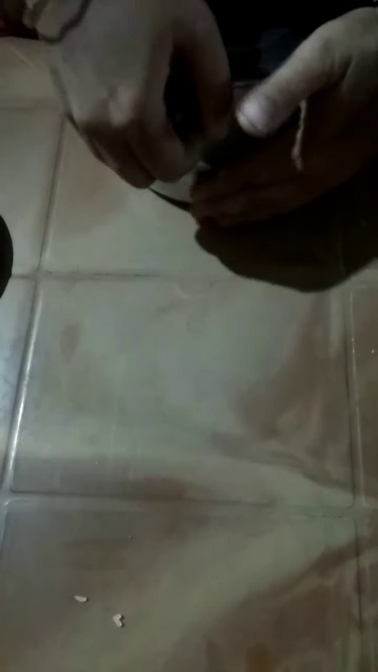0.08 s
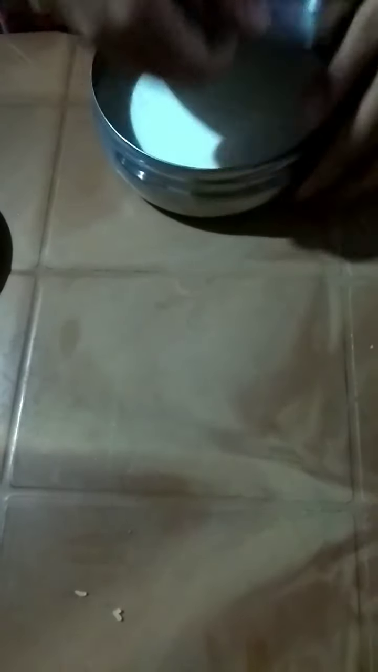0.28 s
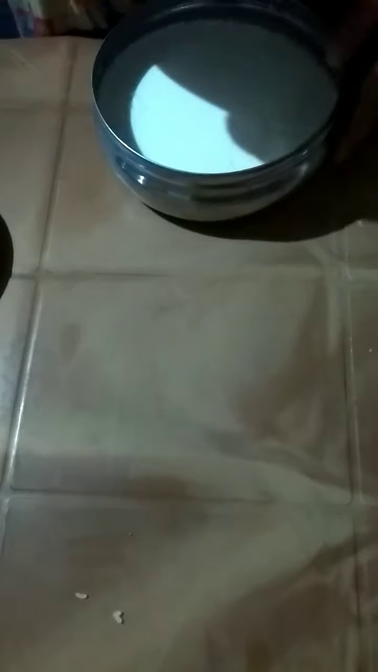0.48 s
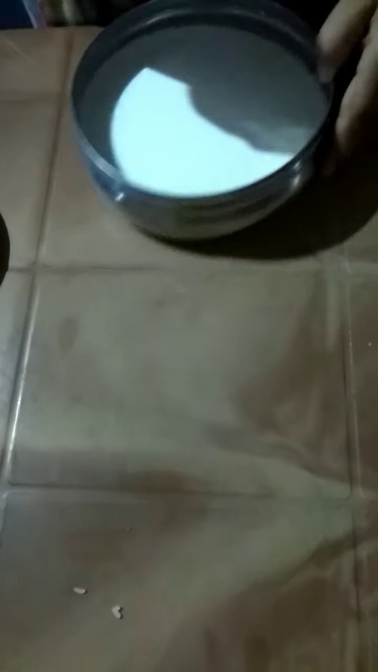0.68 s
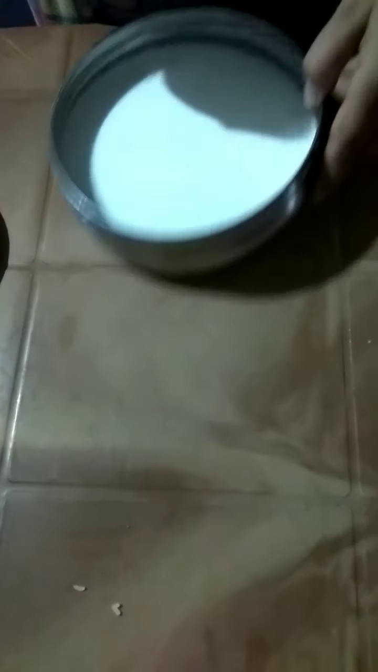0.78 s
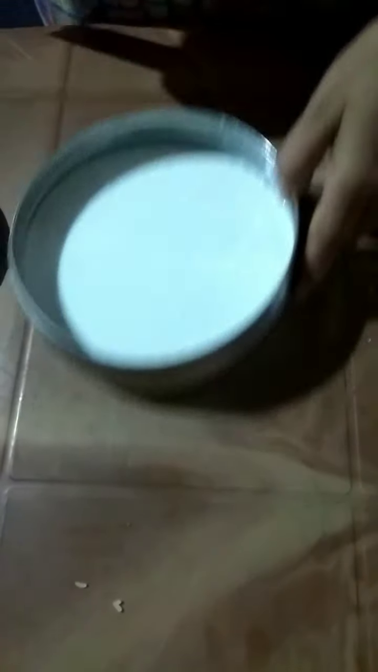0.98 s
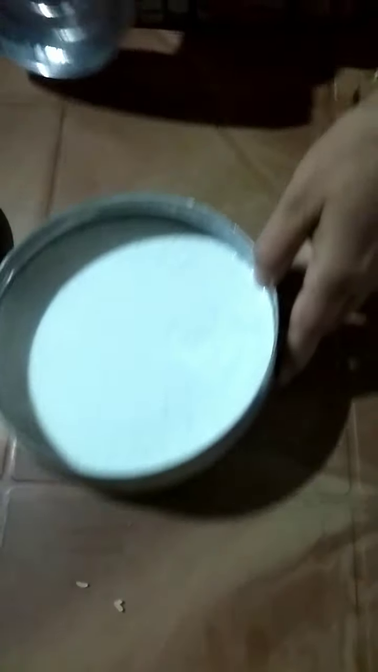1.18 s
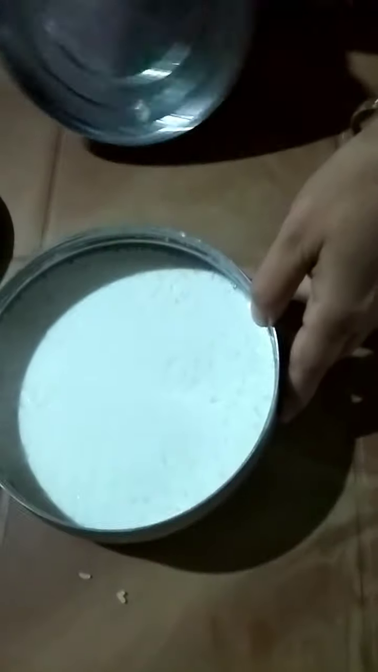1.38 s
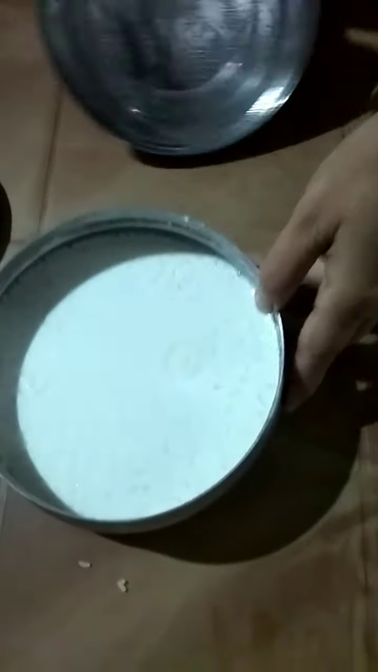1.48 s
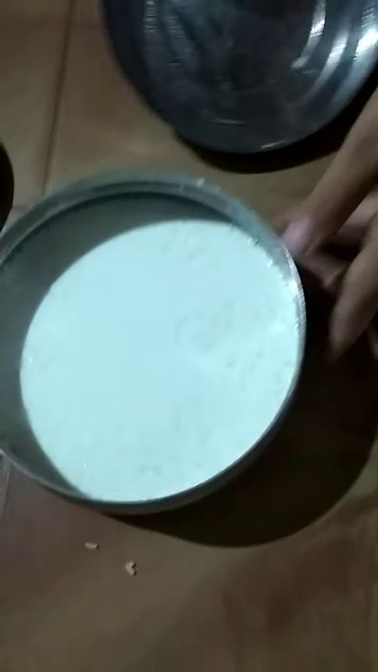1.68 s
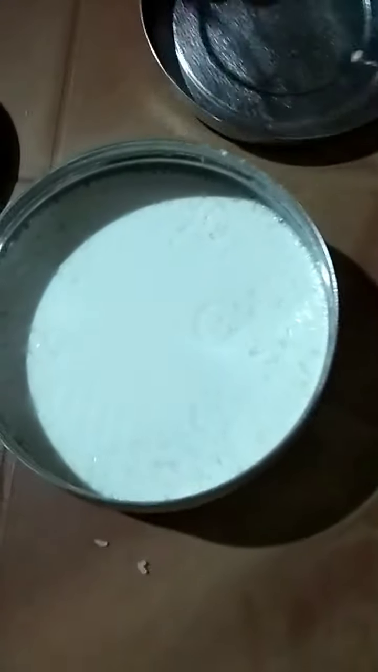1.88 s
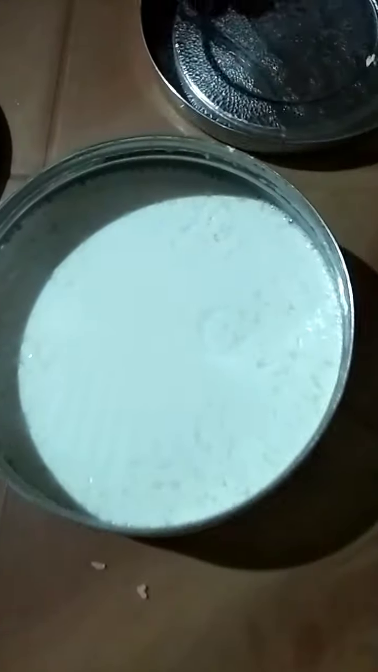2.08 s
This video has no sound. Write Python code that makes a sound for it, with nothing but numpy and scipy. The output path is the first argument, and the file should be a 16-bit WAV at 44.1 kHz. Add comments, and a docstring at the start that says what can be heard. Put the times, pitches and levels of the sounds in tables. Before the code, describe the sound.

A tight steel lid pops off a round tin with a sharp, briefly ringing metallic clank

```python
"""A soft low bump over steady hiss and room rumble; then a tight steel lid pops off a round tin and rings.
The lid ticks lightly as it is lifted away; hands carry the full tin with bumps, knocks and a dry rustle,
then set it down on kitchen tiles with a thud. Struck steel is damped sine modes; contacts are coloured noise
bursts; handling and background are coloured noise; the hard-walled room is noise dying at its own rate
per frequency."""
import sys
import numpy as np
from scipy import signal
from scipy.fft import rfft, irfft, next_fast_len
from scipy.io import wavfile
from scipy.ndimage import uniform_filter1d, map_coordinates

SR = 44100
rng = np.random.default_rng(int(sys.argv[2]) if len(sys.argv) > 2 else 0)


def transcribe(signal):
    """Save signal, clipped to [-1, 1], as a 16-bit WAV file at the path in sys.argv[1]."""
    frames = np.atleast_2d(signal).T
    limited = np.clip(frames, -1, 1)
    pcm = np.round(limited * 32767).astype(np.int16)
    wavfile.write(sys.argv[1], SR, pcm)


N = 92610
TOP_HZ = 15900

# All *_COLOUR tables are spectra, scaled to rms 1 before use: hz, relative_db

# Likeness of left and right noise: hz, correlation
LIKENESS = [(60, 0.94), (150, 1), (300, 1), (640, 0.43), (1400, 0), (3000, 0.026), (7000, 0)]
RASP_LIKENESS = [(200, 0.98), (1500, 0.41), (10000, 0.1)]
# Spacing of the random spectral peaks that stand for dense steel modes
STEEL_MODE_HZ, STEEL_CLUSTER_HZ = 35, 130
STEEL_RIPPLE_DB, RUSTLE_RIPPLE_DB, THUD_RIPPLE_DB = 6.5, 4, 2
CONTACT_ATTACK_S, RING_ATTACK_S = .0005, .001

# Background
HISS_DB, RUMBLE_DB = -54.5, -56.5
HISS_COLOUR = [(350, -65.5), (600, -25), (790, -6), (869, -35), (1750, -26), (2040, -22), (2210, -37),
               (3300, -47), (6370, 3), (8390, -13), (10300, 6), (11300, -11.5), (14500, -2), (15400, -21),
               (16000, -44.5)]
RUMBLE_COLOUR = [(10, -19), (25, 7), (50, -13), (100, -27), (143, -10), (180, -18.5), (300, -13.5),
                 (450, -52), (2000, -82)]

# Dry rustle, before the trim: time_s, level_db
RUSTLE_LEVEL = [(0, -53), (0.19, -57), (0.23, -40.5), (0.5, -63), (0.65, -53.5), (0.73, -48.5), (0.98, -51),
                (1.08, -47), (1.31, -50), (1.48, -60), (1.62, -55.5), (2.1, -57)]
RUSTLE_TRIM_DB, GRAIN_DB = 2, 1
RUSTLE_COLOUR = [(2650, -33), (4500, -6.5), (5280, -1.5), (5960, -10.5), (7690, -1), (8640, -6.5),
                 (9870, -3), (12300, 0), (15200, -8.5), (16000, -14)]
# Skin rubbing on steel: time_s, level_db
RUB_LEVEL = [(0, -58), (0.1, -60.5), (0.55, -62), (0.66, -59), (0.8, -50), (0.95, -54), (1.15, -53.5),
             (1.32, -57), (1.5, -62), (2.1, -70.5)]
RUB_COLOUR = [(150, -38), (250, -3.5), (450, -8.5), (750, -4), (1200, -7.5), (1700, -9.5), (2600, -7),
              (3300, -12.5), (4500, -17), (6000, -12), (8000, -48)]
# Finger sliding along the steel wall as the tin is put down: time_s, level_db
SLIDE_LEVEL = [(1.15, -95), (1.36, -54), (1.48, -55.5), (1.72, -59.5), (1.9, -64)]
SLIDE_COLOUR = [(5500, -57), (6700, -13.5), (7250, 1), (7700, -10), (8400, -51)]
# Low shudder of the carried tin: time_s, level_db
HEFT_LEVEL = [(0, -49.5), (0.15, -58.5), (0.55, -71), (0.63, -47), (0.8, -59), (0.93, -41.5), (1.15, -48.5),
              (1.32, -46.5), (1.5, -59), (2.1, -64.5)]
HEFT_COLOUR = [(21, -30), (35, 3), (135, 1.5), (178, 2), (215, -16), (296, -3.5), (391, -14), (433, -25),
               (500, -12), (650, -26), (1100, -120)]

# Bumps and scuffs of fingers and tin: start_s, level_db, centre_hz, t60_s, width_octaves
BUMPS = [(0.0, -29.5, 35, 0.11, 0.41), (0.0, -39.5, 150.3, 0.29, 0.046), (0.0, -43, 560, 0.15, 1),
         (0.187, -39.5, 305, 0.054, 0.45), (0.206, -41, 138, 0.44, 1), (0.422, -33.5, 2490, 0.088, 0.33),
         (0.606, -48, 290, 0.25, 1), (0.657, -33.5, 463, 0.1, 0.7), (0.678, -40, 136.6, 0.17, 0.031),
         (0.867, -46.5, 284, 0.14, 0.84), (0.897, -45, 410, 0.35, 0.59), (0.924, -40.5, 400, 0.19, 0.45),
         (1.081, -38.5, 1240, 0.048, 0.21), (1.087, -32, 67, 0.22, 0.82), (1.129, -35, 156, 0.052, 0.51),
         (1.134, -47.5, 1060, 0.095, 0.31), (1.347, -36, 134.4, 0.15, 0.1),
         (1.594, -30.5, 940, 0.055, 0.29), (1.692, -39, 280, 0.12, 0.11), (1.694, -44, 613, 0.096, 0.071)]
BUMP_ATTACK_S, BUMP_SKIRT_DB = 0.0032, 9.5

# Catches of the moving tin: start_s, ring_db, ring_hz, click_db
KNOCKS = [(0.602, -39, 292, -44), (0.658, -29, 350, -45), (0.864, -40, 250, -55), (0.925, -36, 290, -47),
          (0.947, -36, 470, -52), (0.96, -42, 242, -45), (1.0802, -33.5, 311, -33), (1.192, -41, 294, -59),
          (1.305, -40, 306, -44)]
KNOCK_T60_S = .035

# Light touches of steel on steel: start_s, level_db, hold_s, tail_db, ring_db
TICKS = [(0.422, -32.5, 0.0023, -43.5, -48.5), (0.678, -28.5, 0.0035, -36.5, -42),
         (1.075, -44.5, .004, -58, -60)]
TICK_COLOUR = [(410, -12), (700, -18), (1890, -11.5), (2730, -18.5), (3840, -3), (4320, -13), (4670, -12),
               (8310, -14.5), (10500, -4.5), (16000, -15)]
TICK_T60_S, TICK_TAIL_T60_S, TICK_PAN_DB = .032, 0.41, -5
# Lid modes damped by fingers: mode_hz, relative_db, t60_s
HELD_LID_MODES = [(999, 0.5, 0.29), (1960, -3.5, 0.43), (2870, -14, 0.25), (3970, 2.5, 0.14)]

# Base of the tin chattering on the tiles: start_s, level_db
CHATTER = [(1.5645, -25), (1.574, -33), (1.582, -35), (1.59, -38), (1.5965, -37), (1.605, -38),
           (1.616, -37), (1.638, -42)]
CHATTER_COLOUR = [(300, -2), (1200, 4), (1800, -6.5), (2700, -9), (5000, -8.5), (9000, -15.5), (16000, -12)]
CHATTER_T60_S = .022
# Full tin meeting the tiles
THUD_S, THUD_DB, THUD_HOLD_S, THUD_T60_S, THUD_PAN_DB = 1.5645, -35, 0.0021, 0.03, -2
THUD_COLOUR = [(35, -31), (100, -4.5), (300, 6), (480, -12), (650, 9), (1050, 1.5), (1600, -20),
               (2400, -31), (5000, -36), (8500, -32), (11500, -37), (16000, -41)]
# Modes of the full tin: mode_hz, level_db, t60_s
TIN_MODES = [(140.4, -27.5, .35), (240, -29, .07), (285, -40, 1.1), (303, -24, .07), (554, -33, .11),
             (750, -31, .04), (1012, -41, .4), (1040, -28, .05), (1443, -46, .62), (1760, -53, .7),
             (2358, -51, .7), (2837, -49.5, .95), (3004, -53, .95)]
THUD_ROOM_DB = -36.5
THUD_ROOM_COLOUR = [(50, -12), (130, -12), (200, 0.5), (300, 4.5), (390, -7), (460, -18), (560, -2),
                    (1050, -6), (1600, -11.5), (2400, -11), (4500, -21), (7200, -17), (15000, -28)]
# Room decay after the thud: hz, t60_s
THUD_ROOM_T60 = [(120, 0.94), (290, 1.0), (500, 0.73), (1000, 0.79), (3000, 1), (8000, 0.83)]

# Lid rasping over the rim
POP_S, POP_DB, POP_HOLD_S, POP_T60_S = 0.2353, -17, 0.0064, 0.054
POP_PAN_DB, POP_LAG_S = -5.5, 0.00029
POP_COLOUR = [(60, -23), (110, -12), (400, -13.5), (1100, -12), (2400, -14.5), (2900, -24), (3400, -10),
              (3900, -5.5), (4300, -13), (4800, -5), (5300, -17), (6100, -7), (6800, -19), (7250, -9),
              (8000, -14), (9800, -12), (11500, -12), (13500, -17), (16000, -20)]
# Air puff from the tin: mode_hz, level_db, t60_s
PUFF_MODES = [(124.2, -29.5, 0.24), (259, -33.5, 0.25), (326, -22.5, 0.097)]
# Rim snapping free: mode_hz, level_db, t60_s
RIM_MODES = [(3450, -12, 0.044), (3578, -13.5, 0.047), (3850, -12.5, 0.02), (4670, -26, 0.046)]
RIM_DELAY_S, RIM_PAN_DB = 0.0016, -4
# Free lid, close pairs beat: mode_hz, level_db, t60_s, left_over_right_db
LID_MODES = [(756, -26, .23, -6), (857, -36, .42, -5), (891, -37, .43, -7), (986, -37, .39, -3),
             (1021, -24.5, .48, -1), (1252, -34, .5, 2), (1425, -31.5, .39, 0), (1522, -35, .44, 4),
             (1550, -26.5, .45, -8), (1782, -33.5, .38, -10), (1990, -42, .6, 4), (2091, -41, .55, 6),
             (2183, -36, .58, -5), (2229, -38, .42, -7), (2261, -37, .38, -6), (2511, -39, .46, 1),
             (2573, -37, .56, 4), (2911, -39, .58, -14), (2962, -40, .5, -6), (3060, -35, .33, -12),
             (3133, -41, .6, -4), (3712, -41, .35, -8), (4821, -39, .33, -10), (6161, -36, .3, -8),
             (8763, -40, .33, -1), (9506, -37, .32, -12)]
POP_ROOM_DB = -21.5
POP_ROOM_COLOUR = [(60, -8), (120, -14.5), (450, -7.5), (800, -8), (1150, -14), (1670, -16), (2100, -8),
                   (2380, -12), (2750, -10.5), (3330, -10), (3600, -13), (4700, -11), (5500, -16),
                   (6200, -10), (7000, -15.5), (8700, -11), (9600, -16), (11000, -7.5), (16000, -24)]
# Room decay after the pop: hz, t60_s
POP_ROOM_T60 = [(100, 0.64), (500, 0.45), (1400, 0.65), (3500, 0.51), (6000, 0.41), (13000, 0.34)]


def amp(db):
    """Decibels to gain."""
    return 10 ** (np.asarray(db) / 20)


def unit(x):
    """Scale to rms 1."""
    return x / np.sqrt(np.mean(x ** 2) + 1e-20)


def along(points, hz):
    """Read (hz, value) points on a log frequency axis."""
    f, v = np.transpose(points)
    return np.interp(np.log(hz + 1), np.log(f + 1), v)


def level(points):
    """Gain per sample from (time_s, level_db) points."""
    return amp(np.interp(np.arange(N) / SR, *np.transpose(points)))


def since(s):
    """Seconds since s, zero before it."""
    return np.maximum(np.arange(N) / SR - s, 0)


def pan(db):
    """Left and right gains for a left-over-right level difference."""
    return amp(np.array([[db], [-db]]) / 2)


def noise(colour, alike=LIKENESS, lag_s=0.0002014, ripple_db=0):
    """Coloured stereo noise of rms 1; the left side lags, and ripple packs it into dense steel modes."""
    hz = np.fft.rfftfreq(N, 1 / SR)
    # mid and side weights set the left-right correlation
    turn = np.arccos(np.clip(along(alike, hz), -1, 1)) / 2
    peaks = np.zeros(len(hz))
    for step_hz in (STEEL_MODE_HZ, STEEL_CLUSTER_HZ):
        knots = rng.standard_normal(int(hz[-1] / step_hz) + 2)
        peaks += map_coordinates(knots, [hz / step_hz])
    # ripple grows to full depth at 2 kHz
    crowded = np.clip(hz / 2000, 0, 1) ** 2
    ripple = ripple_db * crowded * (np.minimum(peaks, 2) - 1 / 2)
    gain = amp(along(colour, hz) + ripple)
    phases = np.exp(2j * np.pi * rng.random((2, len(hz))))
    mid, side = phases * gain * [np.cos(turn), np.sin(turn)]
    left = (mid + side) * np.exp(-2j * np.pi * hz * lag_s)
    return unit(irfft([left, mid - side], N))


def burst(source, s, hold_s, t60_s, attack_s=CONTACT_ATTACK_S):
    """Attack, hold and release on a noise, with the energy set by that shape."""
    attack = 1 - np.exp(-since(s) / attack_s)
    shape = attack * amp(-60 * since(s + hold_s) / t60_s)
    return unit(source * shape) * np.sqrt(np.mean(shape ** 2))


def ring(modes, s, spread=1.08, scatter=True):
    """Damped modes, out of step between microphones as likeness falls; scatter randomises their phases."""
    t, out = since(s), np.zeros((2, N))
    starts = scatter * rng.uniform(0, 2 * np.pi, len(modes))
    for (hz, db, t60_s), start in zip(modes, starts):
        angle = np.arccos(np.clip(along(LIKENESS, hz), -1, 1))
        apart = spread * angle * np.array([[-.5], [.5]])
        out += amp(db - 60 * t / t60_s) * np.sin(2 * np.pi * hz * t + start + apart)
    return out * (1 - np.exp(-t / RING_ATTACK_S))


def room(colour, t60s, s, ripple_db, build_s=0.013):
    """Dense steel modes carried on by the kitchen: each frequency dies at its own speed."""
    hz, t, z = signal.stft(noise(colour, ripple_db=ripple_db), SR, nperseg=512)
    fade = amp(-60 * np.maximum(t - s, 0) / along(t60s, hz)[:, None])
    tail = signal.istft(z * fade, SR, nperseg=512)[1][:, :N]
    return tail * (1 - np.exp(-since(s) / build_s))


def background():
    """Steady hiss over a low room rumble, both stationary noise."""
    hiss = amp(HISS_DB) * noise(HISS_COLOUR)
    rumble = amp(RUMBLE_DB) * noise(RUMBLE_COLOUR)
    return hiss + rumble


def handling():
    """Friction noise of rustle, rub and slide with a shared random grain, plus the tin's low shudder."""
    grain = unit(uniform_filter1d(rng.standard_normal(N), size=300))
    rustle = amp(RUSTLE_TRIM_DB) * level(RUSTLE_LEVEL) * noise(RUSTLE_COLOUR, ripple_db=RUSTLE_RIPPLE_DB)
    rub = level(RUB_LEVEL) * noise(RUB_COLOUR)
    slide = level(SLIDE_LEVEL) * noise(SLIDE_COLOUR)
    heft = level(HEFT_LEVEL) * noise(HEFT_COLOUR)
    return (rustle + rub + slide) * amp(GRAIN_DB * grain) + heft


def bumps():
    """Soft contacts, each a noise resonance that dies away."""
    out, octaves = np.zeros((2, N)), np.linspace(-6, 6, 241)
    for s, db, hz, t60_s, width in BUMPS:
        skirt_db = -BUMP_SKIRT_DB * np.log(1 + (octaves / width) ** 2)
        colour = np.column_stack([hz * 2 ** octaves, skirt_db])
        out += amp(db) * burst(noise(colour), s, 0, t60_s, BUMP_ATTACK_S)
    return out


def knocks():
    """Short catches of the moving tin: a dull click and a few cycles of low ring."""
    out = np.zeros((2, N))
    for s, db, hz, click_db in KNOCKS:
        out += ring([(hz, db, KNOCK_T60_S)], s, scatter=False)
        out += amp(click_db) * burst(noise(CHATTER_COLOUR), s, 0, CHATTER_T60_S)
    return out


def ticks():
    """Short bright grazes with a longer steel tail, ringing the held lid a little."""
    out = np.zeros((2, N))
    for s, db, hold_s, tail_db, ring_db in TICKS:
        graze = burst(noise(TICK_COLOUR), s, hold_s, TICK_T60_S)
        steel = noise(TICK_COLOUR, ripple_db=RUSTLE_RIPPLE_DB)
        tail = burst(steel, s, 0, TICK_TAIL_T60_S, attack_s=0.0037)
        out += amp(db) * pan(TICK_PAN_DB) * graze
        out += amp(tail_db) * tail
        out += amp(ring_db) * ring(HELD_LID_MODES, s)
    return out


def set_down():
    """The full tin meets the tiles: a solid knock, chatter of its base, its damped modes and the room."""
    knock = amp(THUD_DB) * burst(noise(THUD_COLOUR), THUD_S, THUD_HOLD_S, THUD_T60_S)
    chatter = np.zeros((2, N))
    for s, db in CHATTER:
        chatter += amp(db) * burst(noise(CHATTER_COLOUR), s, 0, CHATTER_T60_S)
    # a clean blow starts the modes together
    tin = ring(TIN_MODES, THUD_S, scatter=False)
    tail = amp(THUD_ROOM_DB) * room(THUD_ROOM_COLOUR, THUD_ROOM_T60, THUD_S, THUD_RIPPLE_DB)
    return pan(THUD_PAN_DB) * (knock + chatter + tin + tail)


def lid_pop():
    """The lid rasps over the rim, frees a puff of air and rings; the room answers."""
    scrape = noise(POP_COLOUR, RASP_LIKENESS, POP_LAG_S, RUSTLE_RIPPLE_DB)
    rasp = amp(POP_DB) * pan(POP_PAN_DB) * burst(scrape, POP_S, POP_HOLD_S, POP_T60_S)
    # the rim snaps free just after the rasp begins
    rim = pan(RIM_PAN_DB) * ring(RIM_MODES, POP_S + RIM_DELAY_S)
    puff = ring(PUFF_MODES, POP_S)
    lid = np.zeros((2, N))
    for *mode, side_db in LID_MODES:
        lid += unit(pan(side_db)) * ring([mode], POP_S)
    tail = amp(POP_ROOM_DB) * room(POP_ROOM_COLOUR, POP_ROOM_T60, POP_S, STEEL_RIPPLE_DB)
    return rasp + rim + puff + lid + tail


def scene():
    """All sources at the two microphones."""
    return background() + handling() + bumps() + knocks() + ticks() + set_down() + lid_pop()


def record(dry):
    """Nothing is kept at or above the band limit."""
    m = next_fast_len(N + SR // 2)
    kept = np.fft.rfftfreq(m, 1 / SR) < TOP_HZ
    return irfft(rfft(dry, m) * kept, m)[:, :N]


dry = scene()
out = record(dry)
transcribe(out)
```